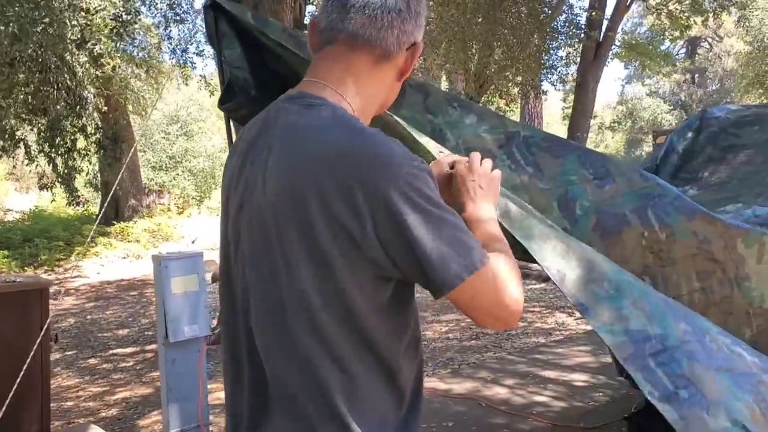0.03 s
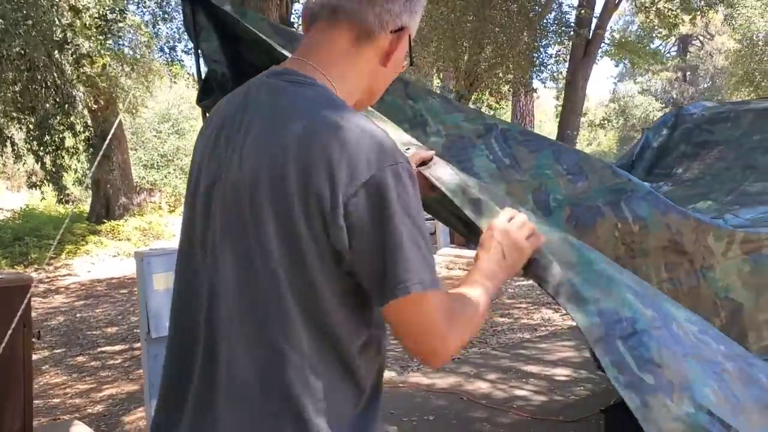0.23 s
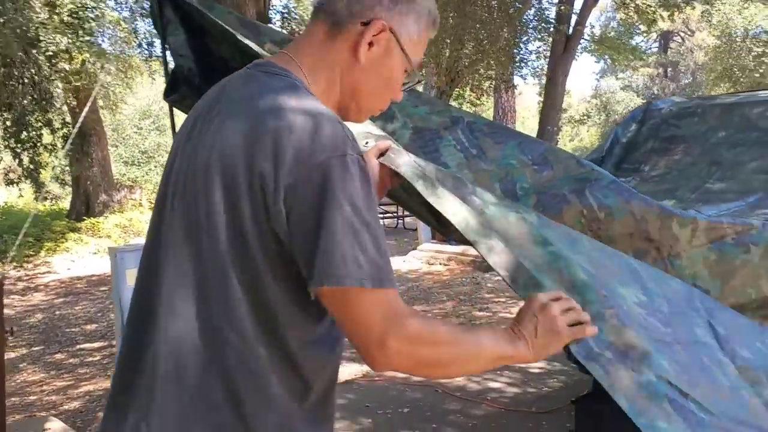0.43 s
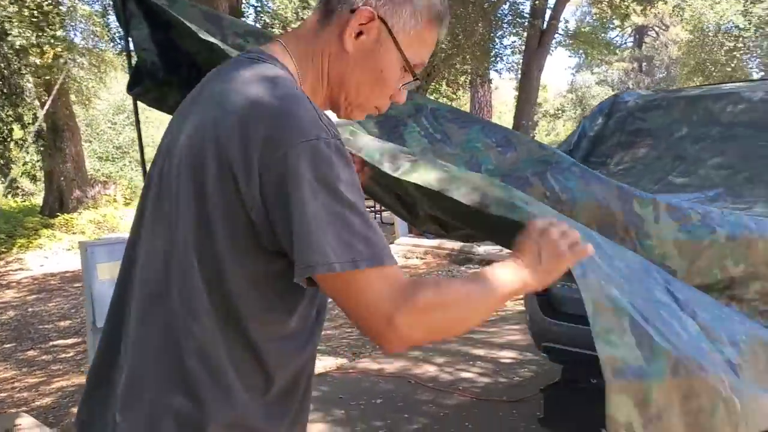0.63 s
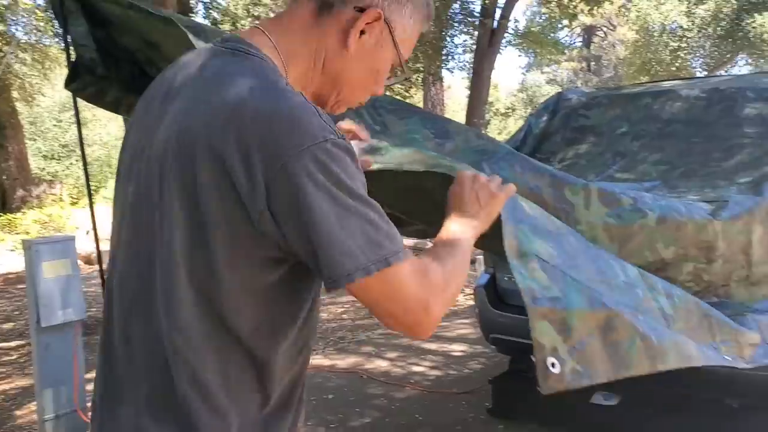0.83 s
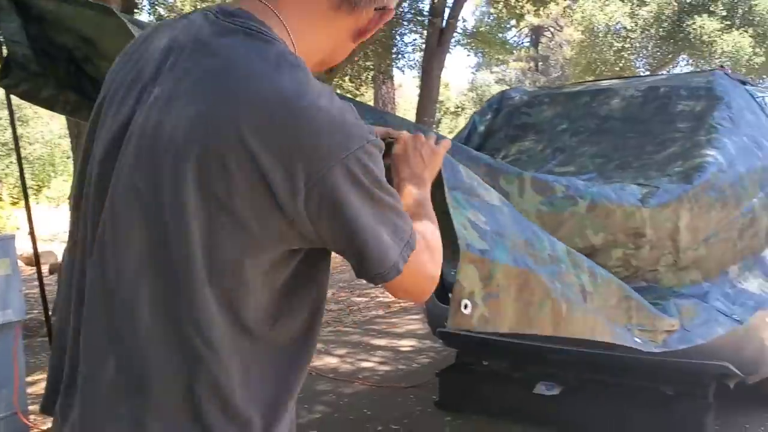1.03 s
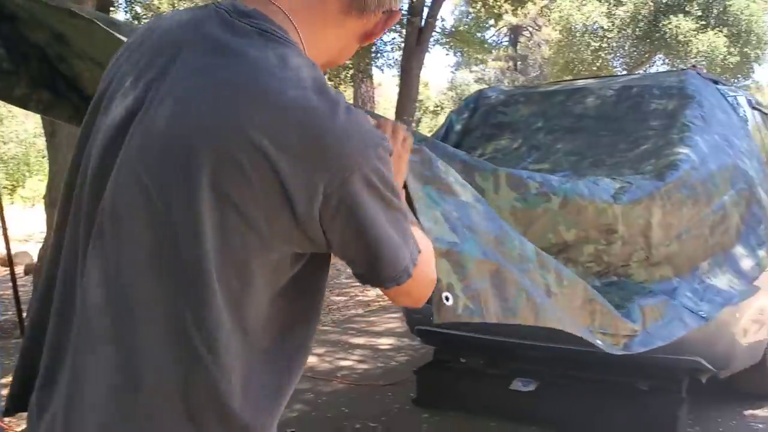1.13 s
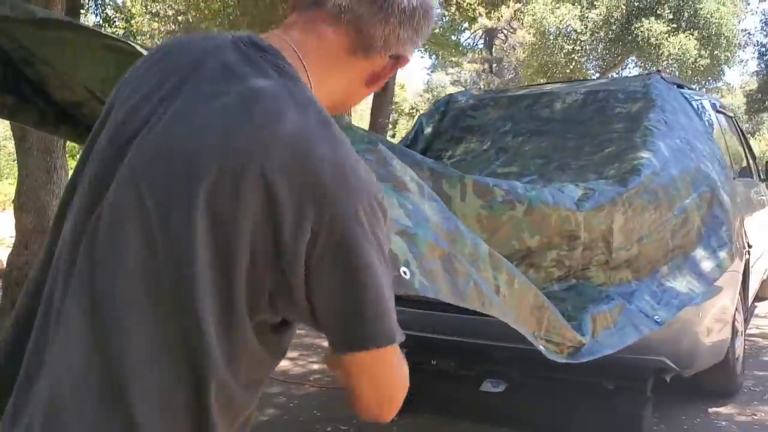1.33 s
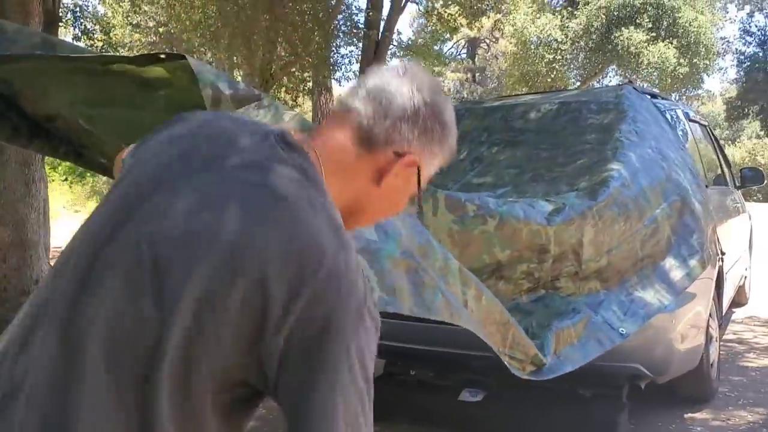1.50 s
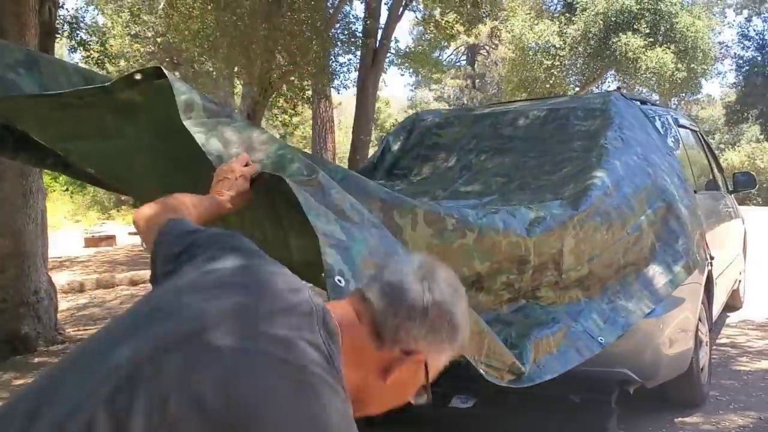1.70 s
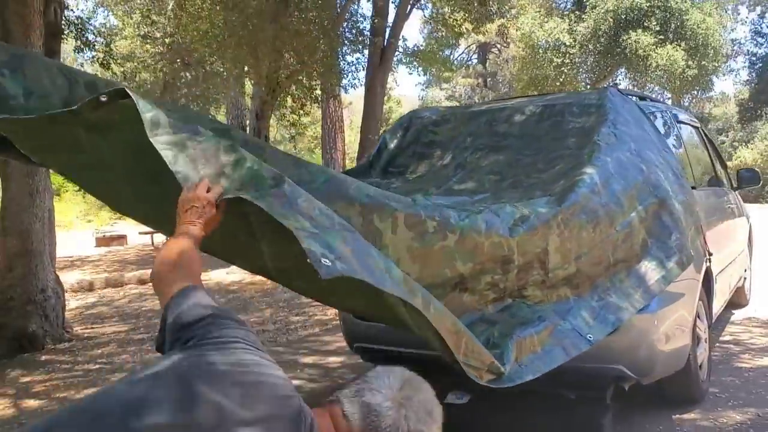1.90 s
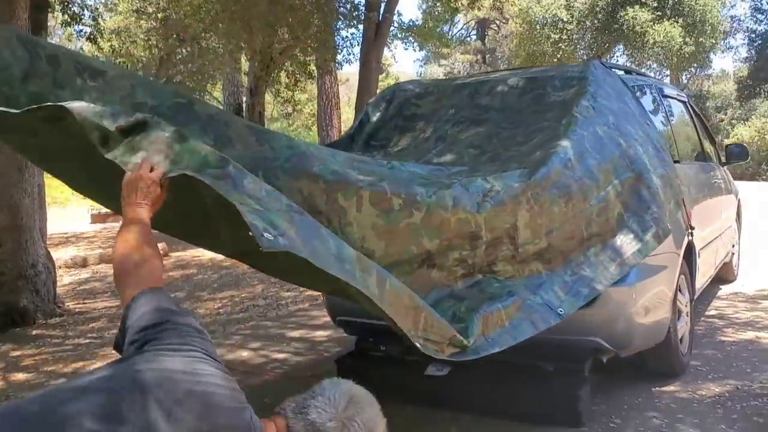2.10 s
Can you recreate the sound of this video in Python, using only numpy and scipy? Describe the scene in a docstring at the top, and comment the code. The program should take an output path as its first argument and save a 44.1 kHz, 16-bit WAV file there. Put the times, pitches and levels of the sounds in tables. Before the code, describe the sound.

A stiff plastic sheet crinkles and slides in bursts, snapping loudly once, over faint outdoor air

```python
"""A plastic tarp is dragged over a pole outdoors, close to a camera with two microphones.
Dense random clicks make its crinkle, slide hiss and low flutter; short ringing bursts are larger creases
snapping, bright bursts are ticks and tears, sinking damped tones are flaps, and one fold cracks loudly.
Farther off: rumble and air in the trees from random spectra, and a faint whistle of narrow noise.
Short scatter off the car, the ground and the sheet surrounds the tarp."""
import sys
import numpy as np
from scipy import signal
from scipy.io import wavfile
from scipy.ndimage import uniform_filter1d

SR = 44100
rng = np.random.default_rng(int(sys.argv[2]) if len(sys.argv) > 2 else 0)


def how_loud(loudness_db):
    """Turn decibels into a plain amplitude multiplier (0 dB gives 1, 20 dB gives 10)."""
    steps = np.asarray(loudness_db, float) / 20
    return 10 ** steps


def generate_wav(sig):
    """Save sig (samples, or channels by samples) to the path in sys.argv[1] as 16-bit PCM at SR."""
    pcm = np.round(np.clip(np.atleast_2d(sig).T, -1, 1) * 32767).astype(np.int16)
    wavfile.write(sys.argv[1], SR, pcm)


N = 94815  # samples, 2.15 s


def evened(x):
    """Scales a sound to an rms of 1."""
    return x / np.sqrt(np.mean(x ** 2) + 1e-20)


def topped(x, db):
    """Sets the peak level in dB."""
    return how_loud(db) * x / abs(x).max()


def levelled(x, db, length):
    """Sets the rms level in dB over the length of a burst in seconds."""
    return how_loud(db) * x / np.sqrt(np.sum(x ** 2) / (length * SR))


def along(rows, axis):
    """One column of a timed table, sample by sample."""
    rows = np.array(rows)
    return np.interp(np.arange(N) / SR, rows[:, 0], rows[:, axis])


def read(points, hz):
    """Reads a frequency table between its points, on a log frequency scale."""
    f, value = np.transpose(points)
    return np.interp(np.log(hz + 1), np.log(f + 1), value)


def coloured(x, points):
    """Causal minimum-phase filter with the given gain curve."""
    gain_db = np.maximum(read(points, abs(np.fft.fftfreq(4096, 1 / SR))), -100)
    log_gain = gain_db / 20 * np.log(10)
    spectrum = np.exp(np.conj(signal.hilbert(log_gain)))
    taps = np.fft.ifft(spectrum).real[:2048]
    return signal.oaconvolve(x, taps[None], axes=1)[:, :x.shape[1]]


def ring(x, hz, q):
    """A single resonance."""
    return signal.lfilter(*signal.iirpeak(hz, max(q, .5), SR), x)


def add(mix, s, sound, side):
    """Places a sound on the sheet; the far microphone is shaded and hears it a little later and softer."""
    spread_s, shadow_db = .0003, 3  # at side 1: lag between microphones; cut at one, equal lift at the other
    for ch, sign in enumerate((1, -1)):
        start = round((s + max(sign * side, 0) * spread_s) * SR)
        part = mix[ch, start:][:len(sound)]
        part += how_loud(-sign * side * shadow_db) * sound[:len(part)]


def crackle(points, level_db, per_s, spread_db, clump_db, clump_s, low_hz, high_hz, patch_q, patch_db):
    """Dense random clicks from nine places across the sheet, each with its own clumps and favoured pitch."""
    out = np.zeros((2, N))
    pitches = rng.permutation(np.geomspace(low_hz, high_hz, 9))
    for side, hz in zip(np.linspace(-1, 1, 9), pitches):
        clumps = evened(uniform_filter1d(rng.standard_normal(N), max(round(clump_s * SR), 2)))
        size = how_loud(spread_db * np.minimum(rng.exponential(1, N), 4) + clump_db * clumps)
        happens = rng.random(N) < per_s / 9 / SR
        clicks = size * rng.choice([-1., 1.], N) * happens
        patch = how_loud(patch_db) * evened(ring(clicks, hz, patch_q))
        add(out, 0, evened(clicks) + patch, side)
    return evened(coloured(out, points)) * how_loud(level_db)


def burst(length, clicky, size):
    """A few slips packed into a moment, swelling to one main slip and dying away."""
    main_slip_s = 0.00048  # bursts this short are mostly one clean buckle
    t = np.arange(size) / SR / max(length, .0005)
    noise = rng.standard_normal((2, size))
    swell = t ** .7 * np.exp(-t ** 1.4)
    slips = swell * noise[0] * how_loud(clicky * noise[1])
    slips[np.argmax(t > .5)] += min(main_slip_s / length, 1) * np.linalg.norm(slips)
    return slips


# pull on the sheet, close by, before drift and scatter: [t/s, crinkle level/dB, slide hiss level/dB]
PULL_LEVELS = [(0, -50.5, -60.5), (.13, -53, -58.5), (.21, -44, -48.5), (.27, -37, -42), (.37, -40.5, -43),
               (.52, -48, -45.5), (.585, -54.5, -63.5), (.607, -43.5, -56), (.77, -45.5, -57),
               (.855, -53.5, -65), (.885, -42.5, -53), (.93, -60.5, -85), (1.0, -54, -64), (1.02, -39, -52),
               (1.1, -47.5, -54.5), (1.18, -48.5, -61), (1.3, -68, -71), (1.36, -46, -59.5),
               (1.39, -43.5, -46.5), (1.45, -48, -59), (1.5, -60.5, -76), (1.55, -56.5, -57.5),
               (1.585, -37.5, -50.5), (1.66, -54, -55), (1.9, -71, -88), (2.06, -54.5, -60),
               (2.15, -62.5, -70.5)]
# colour of creasing plastic: [f/Hz, filter gain/dB]
CRINKLE_COLOUR = [(300, -39), (700, -1.5), (1300, -1), (2000, 5), (3000, 2.5), (4500, -7.5), (7000, -48.5)]


def crinkle():
    """Countless tiny creases buckle as the sheet is pulled."""
    return crackle(CRINKLE_COLOUR, along(PULL_LEVELS, axis=1), per_s=4000, spread_db=3.4, clump_db=3.9,
                   clump_s=.012, low_hz=760, high_hz=3300, patch_q=4.5, patch_db=4)


# colour of the sliding sheet: [f/Hz, filter gain/dB]
HISS_COLOUR = [(2600, -25), (4100, 0.5), (5500, -4), (8400, -4), (11400, -0.5), (15100, -8)]


def slide_hiss():
    """The sliding sheet makes clicks so dense and bright that they fuse into hiss."""
    return crackle(HISS_COLOUR, along(PULL_LEVELS, axis=2), per_s=23000, spread_db=4, clump_db=2,
                   clump_s=.018, low_hz=4540, high_hz=13800, patch_q=.66, patch_db=-7)


# colour of the low flutter: [f/Hz, filter gain/dB]
FLUTTER_COLOUR = [(70, -41), (150, -4), (310, 1), (800, -2.5), (1300, -42.5)]


def flutter():
    """Sparser low clicks whose level follows about half of the crinkle's swing in dB."""
    crinkle_db = along(PULL_LEVELS, axis=1)
    level_db = -59 + 0.48 * (crinkle_db - crinkle_db.mean())
    return crackle(FLUTTER_COLOUR, level_db, per_s=900, spread_db=2.5, clump_db=2,
                   clump_s=.04, low_hz=193, high_hz=806, patch_q=2.45, patch_db=3)


# where the sheet is worked: [t/s, left minus right level/dB]
SHEET_DRIFT = [(0, -2.5), (.23, -5.5), (.38, -2), (.55, -5), (.7, -0.5), (1.15, -2.5), (1.45, -1.5),
               (1.56, 1), (2.15, 1)]


def drifted(tarp):
    """The work moves along the sheet, so the balance between the two microphones drifts."""
    return tarp * how_loud(np.outer([.5, -.5], along(SHEET_DRIFT, axis=1)))


# spectrum of the distance and the trees: [f/Hz, relative level/dB]
AIR_SPECTRUM = [(20, -48), (45, -25), (90, 5), (200, -18), (900, -9.5), (1800, -13), (5000, -30),
                (11000, -29.5), (15500, -26)]
# left-right likeness of that air at the microphones: [f/Hz, likeness from 0 to 1]
AIR_LIKENESS = [(60, 1), (300, 0.43), (1000, 0.022)]


def air():
    """Distant rumble and leaves: random spectra with soft patches."""
    level_db, patch_db = -56.5, 1.3
    frames, hz = N // 256 + 5, np.fft.rfftfreq(1024, 1 / SR)
    a, b, c, d, patches = rng.standard_normal((frames, 513, 5)).T
    patches = evened(uniform_filter1d(uniform_filter1d(patches, 12, 0), 14, 1))
    same = np.clip(read(AIR_LIKENESS, hz), -1, 1)[:, None]
    left = a + 1j * b
    right = same * left + np.sqrt(1 - same ** 2) * (c + 1j * d)
    z = np.array([left, right]) * how_loud(read(AIR_SPECTRUM, hz)[:, None] + patch_db * patches)
    return how_loud(level_db) * evened(signal.istft(z, nperseg=1024, noverlap=768)[1][:, :N])


# far whistle: [t/s, f/Hz, level/dB]
WHISTLE_GLIDE = [(0, 1850, -61), (.13, 1800, -76), (1.66, 1930, -74), (1.74, 1890, -66), (1.85, 1810, -68),
                 (1.92, 1800, -80), (1.98, 1790, -67), (2.15, 1950, -71)]


def whistle():
    """A faint blurred whistle far off, perhaps a bird: narrow noise on a gliding pitch."""
    a, b = uniform_filter1d(rng.standard_normal((2, N)), size=500, axis=1)
    turn = 2 * np.pi * np.cumsum(along(WHISTLE_GLIDE, axis=1)) / SR
    tone = (a + a.std()) * np.sin(turn) + b * np.cos(turn)
    return how_loud(along(WHISTLE_GLIDE, axis=2)) * evened(tone)


# larger creases snapping, before placing, drift and scatter: [t/s, rms level/dB, pitch f/Hz, length/s]
CREASE_SNAPS = [(0.209, -34.5, 2840, 0.0025), (0.268, -25.5, 2290, 0.0012), (0.319, -29, 2930, .003),
                (0.342, -40.5, 840, 0.0049), (0.3931, -26, 1500, 0.0009), (0.495, -32, 2950, 0.0015),
                (0.5687, -29, 3200, 0.0013), (0.572, -36.5, 1300, 0.0017), (0.787, -36, 2140, .0015),
                (.791, -43, 2200, 0.0017), (0.827, -35, 2450, 0.0014), (.83, -39, 1920, 0.0023),
                (0.8675, -30, 1250, 0.0013), (0.8956, -29.5, 1510, 0.00085), (0.944, -42, 2840, .001),
                (1.014, -43, 2270, 0.0064), (1.119, -40.5, 2420, 0.0095), (1.148, -33, 1160, 0.0018),
                (1.152, -39, 960, 0.0032), (1.197, -35, 2360, 0.0011), (1.2014, -29, 2670, 0.0009),
                (1.336, -42.5, 1030, 0.0085), (1.3703, -33.5, 2020, 0.00236), (1.403, -32.5, 2120, 0.0013),
                (1.429, -33, 2110, 0.0021), (1.433, -37.5, 1930, 0.0037), (1.4468, -37, 1760, 0.0011),
                (1.473, -35, 1760, 0.00059), (1.5608, -28, 2700, 0.0051), (1.58, -29, 1460, 0.0023),
                (1.601, -34.5, 1230, 0.0013), (1.718, -45.5, 990, 0.0037), (2.0733, -38, 1770, 0.0016),
                (2.08, -41, 920, 0.00085)]


def snaps():
    """Each crease rings briefly at its own pitch over the broad colour of the sheet."""
    q, wide_db, side_per_db = 1.8, -3.5, -0.11  # the place of a snap follows the drift
    out = np.zeros((2, N))
    for s, db, hz, length in CREASE_SNAPS:
        kick = burst(length, 2.65, size=2500)
        wide = coloured(kick[None], CRINKLE_COLOUR)[0]
        ringing = ring(ring(kick, hz, q), hz, q)
        body = topped(ringing, 0) + topped(wide, wide_db)
        side = side_per_db * np.interp(s, *np.transpose(SHEET_DRIFT))
        add(out, s, levelled(body, db, length), side)
    return out


# flaps of the whole sheet, before drift and scatter: [t/s, peak level/dB, final pitch f/Hz]
SHEET_FLAPS = [(0.322, -31.5, 356), (0.3445, -30.5, 303), (0.547, -39, 450), (0.8675, -29, 310.5),
               (.875, -36, 197), (1.153, -34.5, 342), (1.372, -47, 333), (1.517, -44, 495),
               (1.5638, -26.5, 280), (1.571, -26, 417), (1.5826, -27, 205)]


def flaps():
    """Dull pushes of air of a few cycles; the sheet carries the high part first, so the pitch sinks."""
    q, rise_s = 1.9, .0003
    glide, glide_s = 2.6, .0013  # starts this many pitches higher and sinks with this time constant
    out, t = np.zeros((2, N)), np.arange(3000) / SR
    for s, db, hz in SHEET_FLAPS:
        turns = hz * (t + glide * glide_s * (1 - np.exp(-t / glide_s)))
        envelope = (1 - np.exp(-t / rise_s)) * np.exp(-np.pi * hz * t / q)
        push = envelope * np.sin(2 * np.pi * turns)
        add(out, s, topped(push, db), 0)
    return out


# ticks and tears of the coating, before placing, drift and scatter: [t/s, rms level of each end/dB, length/s]
COATING_TICKS = [(0.3932, -31, .001), (.765, -47.5, 0.0018), (0.791, -48.5, 0.0043), (0.864, -47, 0.003),
                 (0.891, -38.5, 0.0011), (0.943, -48, 0.00089), (1.2, -49, 0.0014), (1.368, -39.5, 0.011),
                 (1.5607, -23.5, 0.0041), (1.577, -36, 0.0079), (1.814, -54, 0.0016),
                 (1.838, -49.5, 0.0036), (1.911, -51, 0.00092)]
# colour of the tearing coating: [f/Hz, filter gain/dB]
TEAR_COLOUR = [(2200, -33), (4500, -13), (8000, -2.5), (11400, -3), (15500, -7)]


def ticks():
    """Bright bursts, each running out from two ends of a fold."""
    out = np.zeros((2, N))
    for s, db, length in COATING_TICKS:
        for sign in (1, -1):
            tear = coloured(burst(length, 1.3, size=2500)[None], TEAR_COLOUR)[0]
            add(out, s, levelled(tear, db, length), sign * rng.random())
    return out


def yard(x):
    """Short scatter off the car, the ground and the sheet itself, different at each microphone."""
    t60_s, first_s = .07, .001
    t = np.arange(6000) / SR
    echoes = rng.choice([-1., 1.], (2, 6000)) * (rng.random((2, 6000)) < .06)
    taps = echoes * how_loud(-60 * t / t60_s) * (t > first_s)
    highpass = signal.butter(2, 450, "high", fs=SR)
    taps = signal.lfilter(*highpass, taps / np.linalg.norm(taps[0]))
    return signal.fftconvolve(x, taps, axes=1)[:, :N]


def scene():
    """The tarp close by with its scatter, over the distant air and whistle."""
    tarp = crinkle() + slide_hiss() + flutter() + snaps() + flaps() + ticks()
    tarp = drifted(tarp)
    scatter = how_loud(-9) * yard(tarp)
    return tarp + scatter + air() + whistle()


def band_limit(x):
    """A steep low-pass at the top of the band."""
    return signal.sosfilt(signal.butter(12, 16480, fs=SR, output="sos"), x)


def record(dry):
    """The camera's band limit takes away the top of the treble."""
    lowpass = signal.firwin(255, 15650, fs=SR)  # edge in Hz
    limited = signal.oaconvolve(dry, lowpass[None], "same", axes=1)
    return band_limit(limited)


dry = scene()
out = record(dry)
generate_wav(out)
```